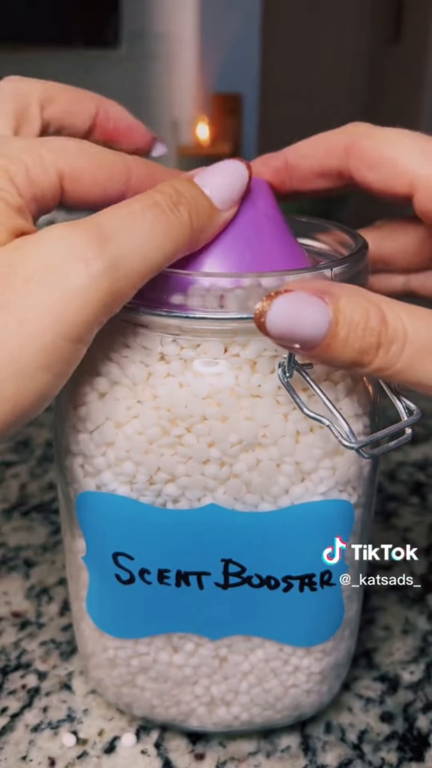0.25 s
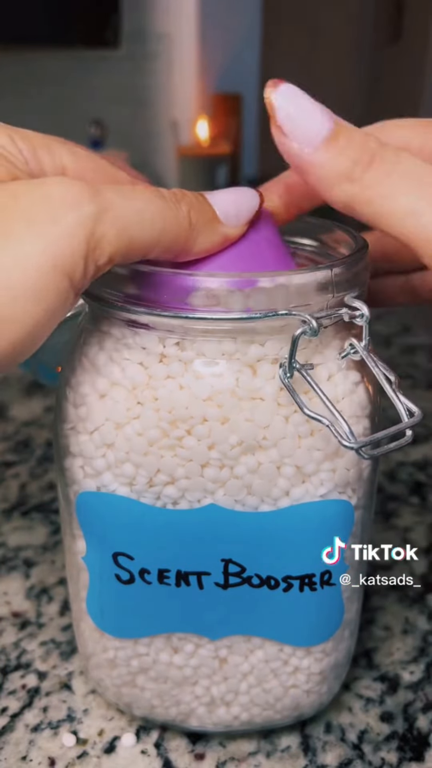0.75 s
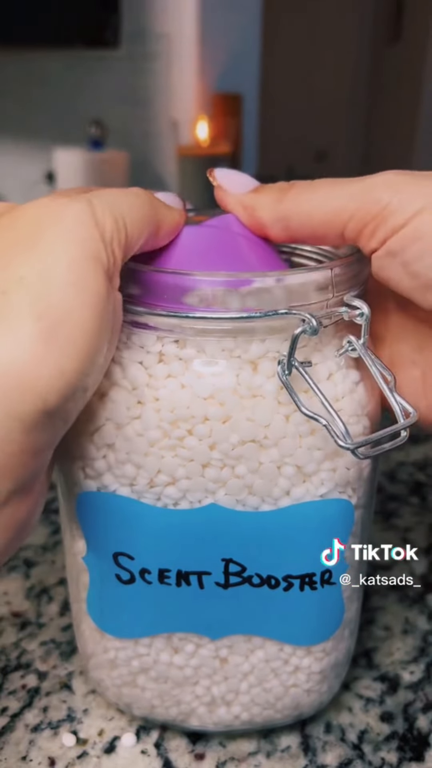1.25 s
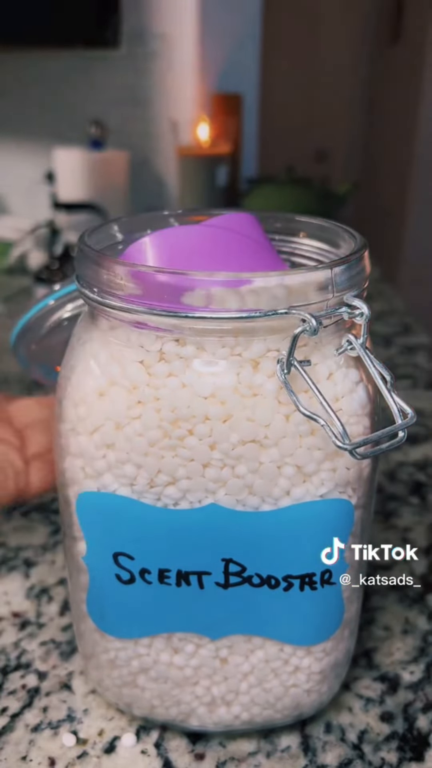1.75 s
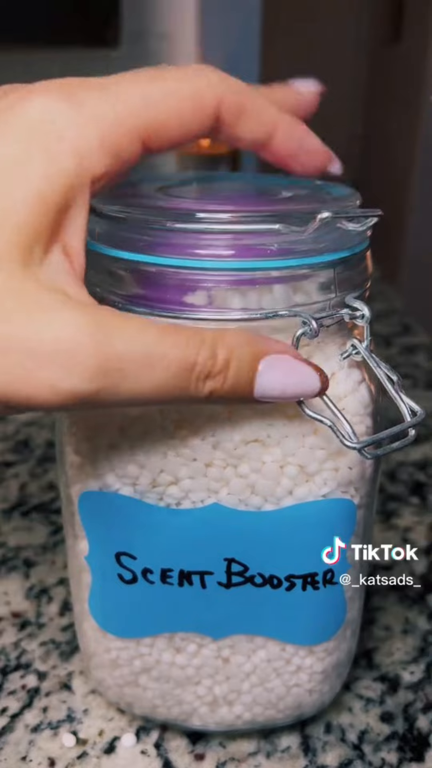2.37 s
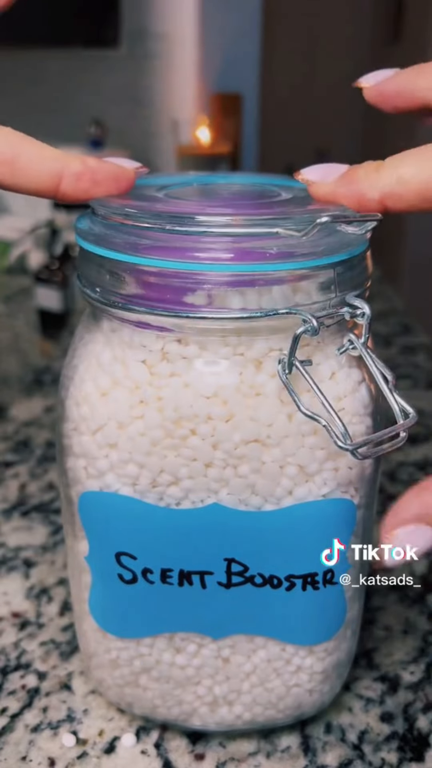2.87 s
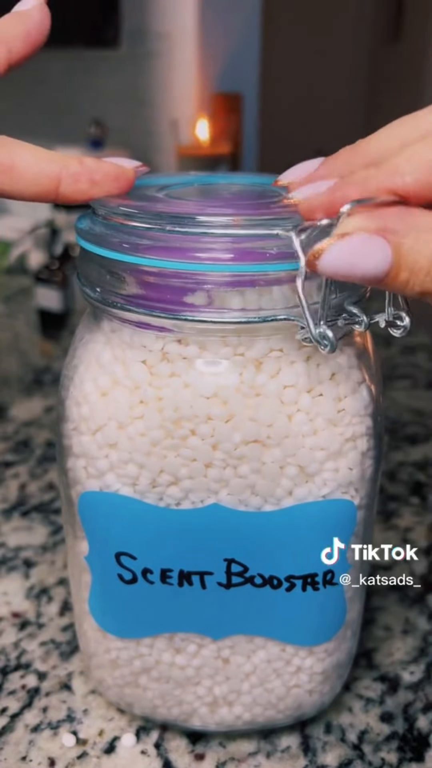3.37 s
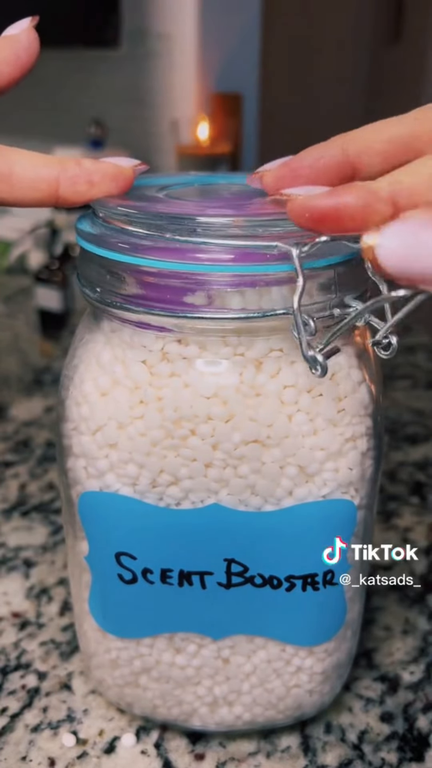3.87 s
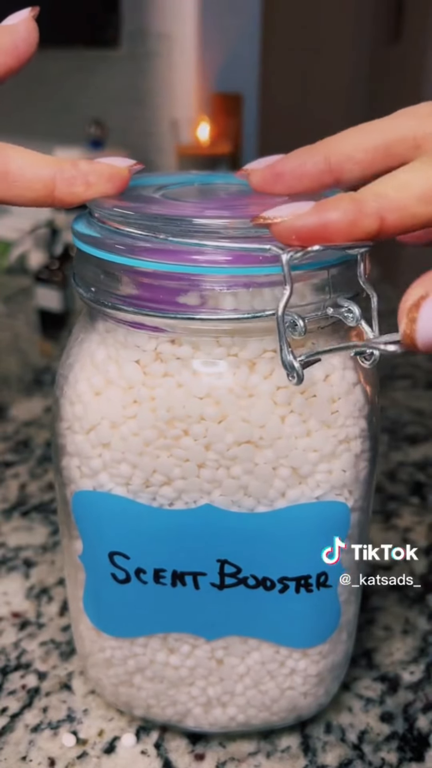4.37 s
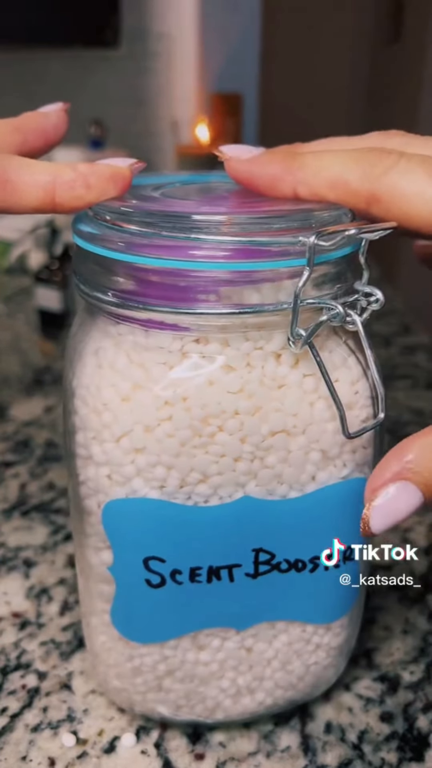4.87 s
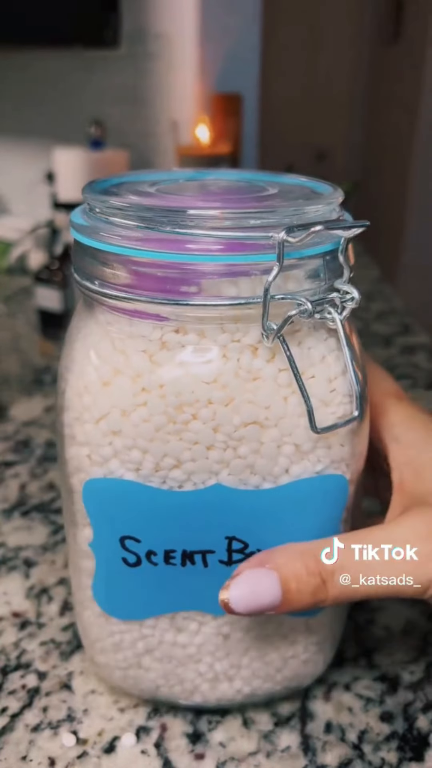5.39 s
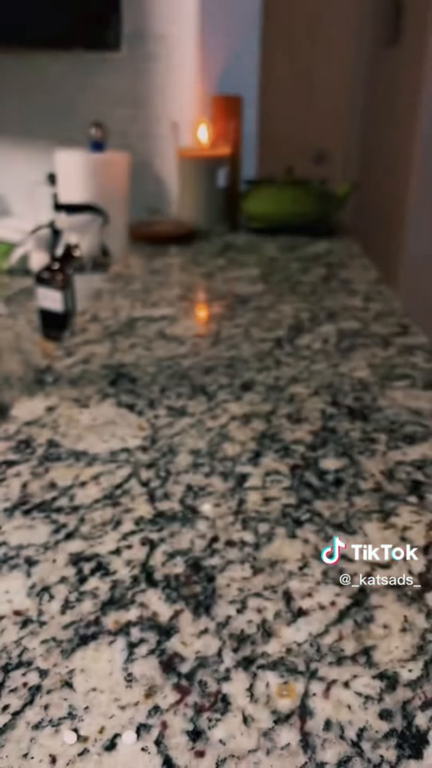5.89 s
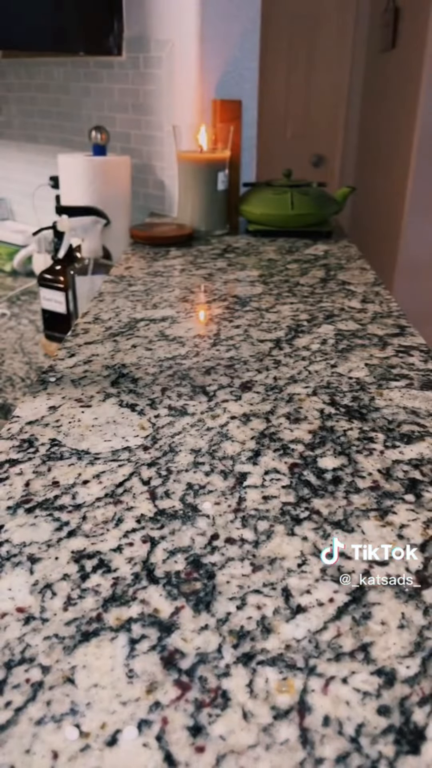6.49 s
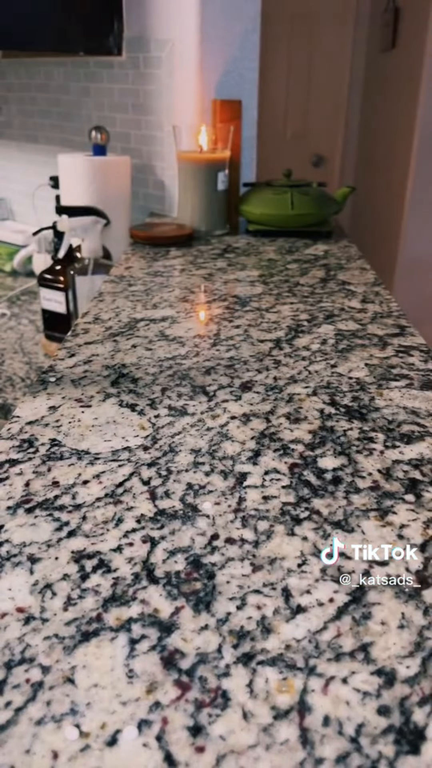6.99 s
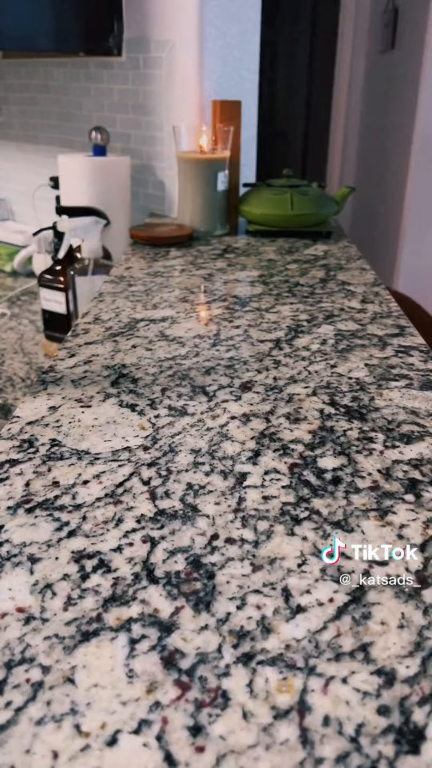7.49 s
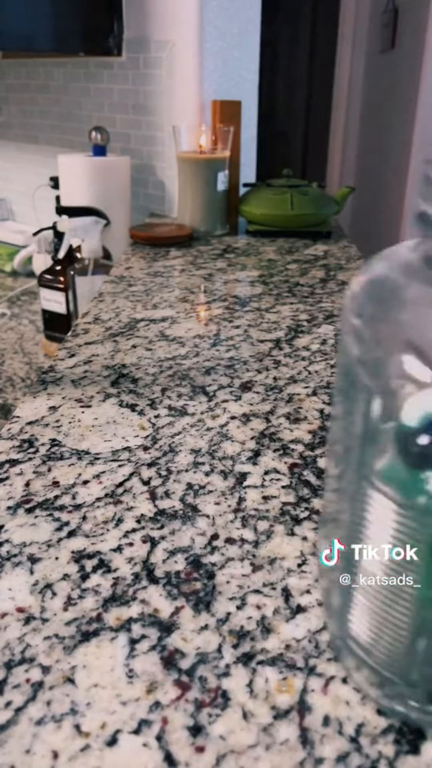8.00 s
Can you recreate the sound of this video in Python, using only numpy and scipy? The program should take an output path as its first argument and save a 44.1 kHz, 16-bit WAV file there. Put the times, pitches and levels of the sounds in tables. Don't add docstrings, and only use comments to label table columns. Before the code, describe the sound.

In a quiet kitchen with faint hum and hiss, a plastic cup is pressed into a bead-filled glass jar with small ticks. The glass lid rattles and claps onto the rim, wire clicks lightly, then the clasp snaps over very sharply and the glass rings briefly. The jar scrapes across stone. After a lull, a hollow ribbed tub bumps down, tilts, lands and drags. Close stereo microphone, short indoor reverberation.

```python
import sys
import numpy as np
from scipy import signal
from scipy.fft import rfft, irfft, next_fast_len
from scipy.io import wavfile
from scipy.ndimage import uniform_filter1d, map_coordinates

SR = 44100
rng = np.random.default_rng(int(sys.argv[2]) if len(sys.argv) > 2 else 0)


def to_linear_factor(level_db):
    exponent = np.asarray(level_db, float) / 20
    return 10 ** exponent


def file_out(sig):
    cols = np.atleast_2d(sig).T
    lim = np.clip(cols, -1, 1)
    pcm = np.round(lim * 32767).astype(np.int16)
    wavfile.write(sys.argv[1], SR, pcm)


N = 363825

# f/Hz, level/dB, t60/s
FAR_MODES = [(268, -1, 0.05), (393, 10, 0.092), (463.5, 5, 0.18), (720, 4, 0.0072), (1460, -14, 0.0054),
             (3180, 0, 0.0082)]
# f/Hz, level/dB, t60/s
TUB_MODES = [(112.2, -23, 0.14), (153, -15, 0.082), (204, -18.5, 0.18), (287.8, -4.5, 0.2),
             (392, -12.5, 0.029), (511, -1, 0.039), (656, 6, 0.013), (753, -0.5, 0.0645), (850, 5, 0.013),
             (1198, 0.5, 0.021)]


def unit(x):
    return x / np.sqrt(np.mean(x ** 2) + 1e-20)


def along(points, hz):
    f, v = np.transpose(points)
    return np.interp(np.log(hz + 1), np.log(f + 1), v)


def wobble(rate):
    knots = rng.standard_normal(int(N * rate / SR) + 4)
    return map_coordinates(knots, [np.arange(N) * rate / SR])


def filtered(x, response):
    m = next_fast_len(N + SR // 2)
    return irfft(rfft(x, m) * response(np.fft.rfftfreq(m, 1 / SR)), m)[..., :N]


def layer_gains(control, layers):
    s, drive_db = np.transpose(control)
    drive_db = np.interp(np.arange(N) / SR, s, drive_db, left=-400, right=-400)
    return [to_linear_factor(level_db + grows * drive_db) for level_db, grows in layers]


def rush(spectrum, patchy_db):
    # f/Hz, correlation
    likeness = [(60, 0.87), (130, 0.67), (290, 0.63), (640, 0.065), (1410, 0.42), (3100, 0.17),
                (15000, 0.26)]
    # f/Hz, level/dB
    room_lean = [(60, -7), (110, 1.5), (200, -5.5), (380, -8.5), (700, 0), (1290, 0), (8120, -0.5),
                 (15000, 0.5)]
    z = signal.stft(rng.standard_normal((2, N)), nperseg=512)[2]
    field = uniform_filter1d(rng.standard_normal(z.shape[1:]), size=5, axis=0)
    field = uniform_filter1d(field, size=8, axis=1)
    pair = signal.istft(z * to_linear_factor(patchy_db * unit(field)), nperseg=512)[1][:, :N]

    def mid_side(hz):
        angle = np.arccos(np.clip(along(likeness, hz), -1, 1)) / 2
        return to_linear_factor(along(spectrum, hz)) * [np.cos(angle), np.sin(angle)]

    mid, side = filtered(pair, mid_side)
    both = np.array([mid + side, mid - side])
    both = filtered(both, lambda hz: to_linear_factor(np.outer([.5, -.5], along(room_lean, hz))))
    return both / np.std(both.mean(0))


def room_tone():
    # t/s, movement re calm/dB
    movement = [(0, 2), (.3, 1), (.7, -1.5), (1.1, -0.44), (2.1, 1.5), (2.7, -0.5), (3.9, 0.2), (4.15, 2),
                (4.35, 0), (5.65, -0.5), (6.1, 1.5), (7.1, -1), (7.4, 4), (8.25, 6.5)]
    layers = [
        (-63, 1.77),
        (-72, 1.64),
        (-66, 1.53),
        (-80.5, 2),
    ]
    # f/Hz, level/dB per Hz
    hum_spectrum = [(12, -34.5), (20, -5.5), (151, 2.5), (304, -1.5), (338, 2), (544, -9), (700, -29.5),
                    (1540, -120)]
    rustle_spectrum = [(290, -24.5), (500, -4), (1210, -7), (1900, -15.5), (2700, -6.5), (3380, -37),
                       (5720, -120)]
    hiss_spectrum = [(1350, -23.5), (2300, -21.5), (2930, -9.5), (4830, -0.5), (5200, -5), (6500, -10),
                     (7500, -38.5), (16500, -120)]
    air_spectrum = [(4000, -32.5), (6800, 1), (7940, 0.5), (9410, -9.5), (11300, -10), (13000, -4.5),
                    (14000, -16), (15500, -12.5)]
    hum, rustle, hiss, air = layer_gains(movement, layers)
    tone = hum * to_linear_factor(2.95 * wobble(28)) * rush(hum_spectrum, patchy_db=0)
    tone += rustle * to_linear_factor(1.2 * wobble(10)) * rush(rustle_spectrum, patchy_db=1.2)
    tone += hiss * rush(hiss_spectrum, patchy_db=1.6)
    return tone + air * rush(air_spectrum, patchy_db=1.2)


def bodies(modes, f, edges_hz, scatter_db=0):
    hz, db, t60 = np.transpose(modes)[:, :, None]
    width = np.log(1000) / np.pi / t60
    sign = (-1) ** np.arange(len(modes))[:, None]
    resonance = 1j * f / (hz * hz - f * f + 1j * f * width)
    radiation = 1j * f / (1j * f + hz / 2) / (1 + 1j * f / (2 * hz)) ** 2
    each = sign * to_linear_factor(db + scatter_db) * resonance * radiation
    group = np.digitize(hz[:, 0], edges_hz)
    return np.array([each[group == g].sum(0) for g in (2, 1, 0)])


def bare(f, low_hz, top_hz):
    return (1j * f / (low_hz + 1j * f)) ** 2 / (1 + 1j * f / top_hz) ** 2


def contacts(events, touch, modes, crack_db, top_hz, scatter_db, blow, body_db,
             edges_hz=(600, 2050), size=10240):
    lead_in = 2048
    out, f = np.zeros(N + size), np.fft.rfftfreq(size, 1 / SR)
    t = (np.arange(size) - lead_in) / SR
    for s, db, knock_db, thump_db, *own in events:
        rise = touch[0]
        length = own[-1] if own else touch[1]
        onset = np.exp(np.minimum(t, 0) / rise)
        swell = np.minimum(onset, to_linear_factor(-60 * np.maximum(t, 0) / length))
        sharp = np.exp(-np.abs(t) / 0.0003)
        push = rng.standard_normal((3, size)) * (swell + blow * sharp)
        scatter = scatter_db * rng.standard_normal((len(modes), 1))
        rings = irfft(rfft(push) * bodies(modes, f, edges_hz, scatter), size)
        crack = irfft(rfft(push[0]) * bare(f, 1200, top_hz), size)
        rings[0] = unit(rings[0]) + to_linear_factor(crack_db) * unit(crack)
        rings /= np.abs(rings).max(1, keepdims=True)
        peaks_db = [db, db + knock_db + body_db, db + thump_db + body_db]
        out[round(s * SR):][:size] += to_linear_factor(peaks_db) @ rings
    return out[lead_in:][:N]


def scrape(speed, layers, modes, rate, spread_db, smooth, bare_db, top_hz):
    hits = rng.random(N) < rate / SR
    sizes = to_linear_factor(spread_db * np.minimum(rng.exponential(1, N), 2))
    grains = hits * sizes * np.clip(rng.standard_normal(N), -2, 2)
    rub = unit(grains) + smooth * rng.standard_normal(N)
    rub = rub * to_linear_factor(1.1 * wobble(45))
    grit, body, rumble = filtered(rub, lambda f: bodies(modes, f, (450, 1800)))
    grit = unit(grit) + to_linear_factor(bare_db) * unit(filtered(rub, lambda f: bare(f, 2000, top_hz)))
    rumble_gain, body_gain, grit_gain = layer_gains(speed, layers)
    return rumble_gain * unit(rumble) + body_gain * unit(body) + grit_gain * unit(grit)


def cup():
    # t/s, tick peak level/dB, knock re tick/dB, thump re tick/dB, own t60/s
    presses = [
        (0.0453, -43, -22, -46, 0.07),
        (0.0847, -65, -17, -27, 0.016),
        (0.1191, -51, -36, -33, 0.13),
        (0.9363, -51.5, -29, -10, 0.096),
        (0.9537, -43, -5.5, 2.5, 0.086),
        (1.0045, -42.5, -30, -4.5, 0.08),
    ]
    # t/s, tick peak level/dB, knock re tick/dB, thump re tick/dB
    brushes = [
        (0.1898, -53.5, -34, -23),
        (0.5467, -69, -28, 3),
        (1.134, -62, -35, -28),
        (1.275, -60, -39, -21),
        (1.445, -48.5, -21, -1.5),
    ]
    # f/Hz, level/dB, t60/s
    cup_modes = [(162, -9, 0.035), (266, -7.5, 0.065), (412, 8, 0.041), (527, -6.5, 0.0091),
                 (910, -8, 0.052), (1230, -1, 0.019), (1750, 0, 0.0086), (3800, 9, 0.014),
                 (5900, -1, 0.019), (12200, 10, 0.0038)]
    out = contacts(presses, (0.0044, .09), cup_modes,
                   crack_db=8, top_hz=8950, scatter_db=7.5, blow=0.24, body_db=8)
    return out + contacts(brushes, (0.0081, 0.2), cup_modes,
                          crack_db=26, top_hz=6900, scatter_db=18, blow=.1, body_db=5)


def glints():
    # t/s, top ring peak level/dB, middle re top/dB, low re top/dB, own t60/s of slow glints
    glint_events = [(.045, -53, -3, -6), (0.7, -54, 0, -10), (1, -47, 6.5, -13), (1.2, -52, -5, 10, 0.07),
                    (2.5, -59, -7, -7), (2, -43.5, -14, 1), (3, -57, -6, -7, .1), (3.5, -55, 7, -15, -0.15),
                    (3, -38.5, -1, -7), (3.5, -51.5, -14, 4, 0.13), (4, -55, -10, -5), (3.5, -48, 5, -13),
                    (4, -47, -9, -18), (4, -62, 13, -5)]
    # f/Hz, level/dB, t60/s
    glint_modes = [(6190, 0, .015), (9600, -3, 0.0044), (10650, 0, 0.0088), (11300, 0, 0.01168),
                   (12720, 0.5, .006)]
    return contacts(glint_events, (0.0027, 0.031), glint_modes, crack_db=-29.5, top_hz=8890,
                    scatter_db=3, blow=.6, body_db=-5, edges_hz=(8000, 11100))


def nails():
    # t/s, tick peak level/dB, knock re tick/dB
    ticks = [(.0857, -40, -22), (.188, -64, -24), (.7163, -63, -20), (.8859, -53, -24), (1.28, -54, -26),
             (1.6282, -59, -22), (1.7779, -55.5, -20.5), (1.9909, -53, -19), (2.354, -43, -20),
             (5.03, -55, -9), (7.299, -46, -23)]
    thump_db = -24
    return contacts([(*row, thump_db) for row in ticks], (0.0027, 0.031), FAR_MODES,
                    crack_db=2, top_hz=4900, scatter_db=-3, blow=1.4, body_db=-4.5)


def counter():
    # t/s, peak level/dB
    thuds = [
        (.985, -43.5),
        (3.411, -39),
        (3.471, -47),
        (4.383, -39),
        (4.639, -40.5),
        (4.964, -45),
        (5.938, -39),
    ]
    # t/s, peak level/dB
    pats = [
        (1.251, -52.5),
        (2.102, -49),
        (4.201, -43.5),
        (4.799, -44.5),
        (5.301, -49.5),
    ]
    # f/Hz, level/dB, t60/s
    counter_modes = [(98, 0.0012, 0.032), (144.7, 0.00053, 0.087), (700, 0, 0.022), (3000, 0, .004)]
    out = contacts([(s, db - 32, 8, 32) for s, db in thuds], (0.0028, 0.026), counter_modes,
                   crack_db=-5.5, top_hz=5000, scatter_db=4.5, blow=0, body_db=-1.5)
    return out + contacts([(s, db - 33, 8, 32) for s, db in pats], (0.019, 0.18), counter_modes,
                          crack_db=-5.5, top_hz=4030, scatter_db=1, blow=0, body_db=-2)


def clasp():
    # t/s, tick peak level/dB, knock re tick/dB, thump re tick/dB
    wire_ticks = [(1.8891, -39.5, -24, -34), (2.1078, -37, -21, -36), (2.1525, -45, -17.5, -15),
                  (2.5097, -51.5, -5, -4), (2.9643, -35.5, -20, -24), (3.1247, -32.5, -13, -11),
                  (3.4138, -45, -16, -17), (3.7155, -34, -18, -35), (3.875, -39.5, -26, -23),
                  (3.9005, -37.5, -30, -21), (3.9588, -26, -17, -22.5), (4.2318, -42, -25, -7.5)]
    # t/s, tick peak level/dB, knock re tick/dB, thump re tick/dB, own t60/s
    rubs = [(3.0243, -42.5, -3.5, 1.5, 0.11), (3.0391, -40.5, -15, -24, 0.13),
            (3.3244, -50, -12.5, -12, 0.089), (3.3947, -55, -21, -16, 0.21),
            (3.4348, -47, -23, -14.5, 0.091), (3.8639, -47.5, -11, -18, 0.12),
            (4.06, -71.5, 12.5, 11.5, 0.091), (4.2492, -64.5, 5.5, 13, 0.1), (4.369, -75.5, 9, 15.5, 0.16),
            (5.11, -68, 3, 8, 0.22), (5.1779, -65, -1, 2.5, 0.77), (5.4079, -54, -21.5, -19, 0.31),
            (7.1545, -46, -23.5, -38, 0.13), (7.195, -43, -48, -44, 0.32), (7.2498, -48.5, -43, -42, 0.98),
            (7.2981, -44.5, -42, -44, 0.2)]
    # f/Hz, level/dB, t60/s
    wire_modes = [(145.4, -13.5, 0.11), (232, -8.5, 0.042), (315, 0, 0.072), (502, 0.5, 0.027),
                  (870, 16, 0.0073), (1800, -4, 0.0052), (2800, 12.5, 0.0022), (3635, -6, 0.015),
                  (5860, 1, 0.017), (10100, -9.5, 0.0088), (11700, -3.5, 0.011)]
    out = contacts(wire_ticks, (0.0027, 0.031), wire_modes,
                   crack_db=2, top_hz=8980, scatter_db=4.5, blow=1.4, body_db=4)
    return out + contacts(rubs, (0.0053, .12), wire_modes,
                          crack_db=7, top_hz=12900, scatter_db=11.5, blow=0.22, body_db=11)


def lid():
    # t/s, tick peak level/dB, knock re tick/dB, thump re tick/dB
    skids = [
        (2.187, -55, 13.5, 4),
        (2.203, -40.5, 13.5, -1.5),
    ]
    rattles = [
        (2.197, -38, 13, -3),
        (2.219, -40, 6.5, 8.5),
        (2.232, -38.5, 15.5, 11.5),
        (2.254, -43, -3, 13),
        (2.285, -37.5, -3, -4.5),
    ]
    claps = [
        (2.2078, -33, 15.5, 11),
        (2.2432, -24, -9.5, -2.5),
        (2.3, -29.5, -2.5, -5),
        (2.392, -49, -29, -9),
    ]
    settlings = [
        (2.325, -47.5, -24, 10.5),
        (2.34, -36, -16, 2.5),
    ]
    # f/Hz, level/dB, t60/s
    lid_modes = [(195, -10.5, 0.06), (353, -1.5, 0.025), (533, -6, 0.025), (854, -10, 0.029),
                 (1190, 2.5, 0.014), (1390, 3.5, 0.011), (1677, -5, 0.0096), (2830, -4.5, 0.012),
                 (4780, -15, 0.014), (6030, -6, 0.022), (11300, -12.5, 0.005)]
    seal_modes = [(174, 5.5, 0.092), (262, -15.5, 0.043), (760, 9, 0.025), (1230, -18, .02),
                  (3040, -17, 0.0025), (12600, -3, 0.0029)]
    out = contacts(skids, (0.0017, .06), lid_modes,
                   crack_db=-11.5, top_hz=3000, scatter_db=4.5, blow=0, body_db=-1)
    out += contacts(rattles, (0.0033, 0.071), lid_modes,
                    crack_db=-10, top_hz=8970, scatter_db=9.5, blow=.1, body_db=3.5)
    out += contacts(claps, (.0018, .016), lid_modes,
                    crack_db=-2.5, top_hz=14100, scatter_db=3, blow=1.3, body_db=8)
    return out + contacts(settlings, (0.0028, 0.026), seal_modes,
                          crack_db=4.5, top_hz=8960, scatter_db=-1.5, blow=.1, body_db=5)


def loose_glass():
    # t/s, tick peak level/dB, knock re tick/dB
    chatter = [
        (2.19, -58, 22),
        (2.2, -47.5, 22.5),
        (2.229, -48, 21.5),
        (2.2427, -37.5, 14.5),
        (2.2991, -39, 18.5),
    ]
    # f/Hz, level/dB, t60/s
    rim_modes = [(300, 0, .03), (1167, -2.5, .02), (1422, 6, .012), (2983, 0, .02), (6030, -3, .015)]
    # t/s, high peak level/dB, middle re high/dB, low re high/dB
    chimes = [
        (4.6195, -37, 6, -16),
        (4.637, -40.5, 4.5, -40.5),
    ]
    # f/Hz, level/dB, t60/s
    chime_modes = [(1961, 0, 1.07), (2767, 6.5, 0.0995), (2869, -1, .28), (4940, -1, .2), (5750, 3, .15),
                   (6100, -1.5, .2), (7800, -3.5, .08), (14000, 5, .6)]
    out = contacts([(*row, -5) for row in chatter], (.0018, .018), rim_modes,
                   crack_db=-4.5, top_hz=9000, scatter_db=3.5, blow=.8, body_db=-2)
    return out + contacts(chimes, (0.0027, 0.031), chime_modes, crack_db=-30, top_hz=9000, scatter_db=-1.5,
                          blow=3, body_db=0.5, edges_hz=(2300, 4400), size=40960)


def stirs():
    # t/s, tick peak level/dB, knock re tick/dB, thump re tick/dB
    stirrings = [
        (2.62, -73.5, 0, 15.5),
        (4.17, -57.5, -2, 5),
        (5.05, -67, 11, 14.5),
        (5.24, -71.5, 11, 13),
        (6.6, -65, 9.5, 5.5),
        (6.7, -62.5, 1, -8),
        (7.05, -69, 12, -6),
    ]
    return contacts(stirrings, (0.019, 0.18), FAR_MODES,
                    crack_db=1, top_hz=2500, scatter_db=3.5, blow=0, body_db=-1.5)


def clasp_snap():
    # t/s, tick peak level/dB, knock re tick/dB, thump re tick/dB
    strikes = [
        (4.6191, -9, -16.5, -24),
        (4.6281, -17, -17.5, -14),
        (4.6361, -14, -42, -29.5),
    ]
    # f/Hz, level/dB, t60/s
    snap_modes = [(60.3, -12.5, 0.059), (181.4, -7, 0.041), (360, -2, 0.068), (497, -8.5, 0.0367),
                  (790, 8.5, 0.023), (1640, 1, 0.0065), (1980, -40, .3), (2800, -3, .055),
                  (4960, -7.5, 0.044), (6410, 24.5, 0.01), (12070, -17.5, 0.022), (13950, -16.5, 0.24),
                  (15530, -14.5, 0.06)]
    return contacts(strikes, (0.0046, 0.016), snap_modes, crack_db=4, top_hz=16000,
                    scatter_db=-5.5, blow=3.1, body_db=5.5, size=30720)


def jar_slide():
    # t/s, tick peak level/dB, knock re tick/dB, thump re tick/dB
    far_knocks = [
        (4.79, -67.5, 10.5, 3.5),
        (6.0982, -49, -14, -18),
        (6.2244, -66.5, -3, 4),
        (6.2764, -52.5, -10.5, -5),
        (6.3443, -65, 4.5, -2),
        (6.4247, -68, 2, 11.5),
        (6.4694, -65.5, -0.5, 6),
    ]
    # t/s, speed re middle/dB
    slide = [
        (5.733, -9.5),
        (5.755, 0.5),
        (5.79, 0),
        (5.82, 1.5),
        (5.85, 0.5),
        (5.875, 4.5),
        (5.92, 4.5),
        (5.945, -4),
        (5.99, -10.5),
    ]
    layers = [
        (-47.5, 1.3),
        (-43, 2),
        (-56, 1.6),
    ]
    # t/s, tick peak level/dB, knock re tick/dB, thump re tick/dB
    catches = [
        (5.757, -63, 13, 25),
        (5.773, -63.5, 5, 24.5),
        (5.813, -52, 0, 8),
        (5.845, -58, 18, 14),
        (5.873, -50, 17, 20),
        (5.882, -54, 20.5, 19),
        (5.899, -59, 26, 7),
        (5.94, -59.5, 25.5, 29),
        (5.953, -48, 7, 2),
    ]
    # f/Hz, level/dB, t60/s
    jar_modes = [(139, -8, 0.1), (222, -2.5, 0.054), (320, -6, 0.073), (538, -1.5, 0.037),
                 (857, -1.5, 0.034), (1265, -4.5, 0.036), (1610, -14, 0.021), (1930, 2, 0.0061),
                 (3110, -10, 0.019), (6400, 13, 0.0022), (11600, -1.5, 0.004)]
    out = contacts(far_knocks, (0.019, 0.18), FAR_MODES,
                   crack_db=2.5, top_hz=2820, scatter_db=9.5, blow=.1, body_db=11)
    out += scrape(slide, layers, jar_modes, 4000, spread_db=3, smooth=1.1, bare_db=-9.5, top_hz=11900)
    return out + contacts(catches, (0.0037, 0.04), jar_modes,
                          crack_db=6, top_hz=3500, scatter_db=3.5, blow=0.28, body_db=0)


def loose_ribs():
    # t/s, high peak level/dB, middle re high/dB, low re high/dB
    buzzes = [
        (7.3, -57, 15.5, 10),
        (7.372, -49, 12, 4),
        (7.862, -45, 13, -6),
        (7.882, -42, 10, -4),
        (7.972, -45, 8, -6),
        (8.085, -46, 2, 0),
    ]
    # f/Hz, level/dB, t60/s
    buzz_modes = [(2240, -2, .03), (2950, -6, .04), (3900, -4, 0.036), (4130, 4, .1), (4370, 3, 0.045),
                  (5870, 11, .02), (7800, 6, 0.011), (12760, -6, 0.24)]
    return contacts(buzzes, (0.004, .07), buzz_modes, crack_db=-2, top_hz=8000,
                    scatter_db=6.5, blow=0.27, body_db=-1.5, edges_hz=(3300, 5200))


def tub_bumps(events, ribs):
    return contacts(events, (0.004, .07), TUB_MODES + ribs, crack_db=-9, top_hz=2240, scatter_db=1.5,
                    blow=1.24, body_db=1, edges_hz=(600, 1600), size=20480)


def tub():
    # t/s, tick peak level/dB, knock re tick/dB, thump re tick/dB, own t60/s
    set_down = [
        (7.3572, -25.5, -6, 8.5, 0.019),
        (7.3652, -16.5, -6, 2.5, 0.074),
        (7.3774, -32, -8, 5, 0.1),
        (7.5762, -39, -11, -5, 0.088),
    ]
    tilts = [
        (7.7478, -35.5, -37, -3, 0.067),
        (7.8236, -38.5, -11, -14, 0.074),
        (7.856, -25.5, -2, 8, 0.065),
        (7.8714, -19, -0.5, -4, 0.14),
        (7.8835, -24, -2, 3.5, 0.081),
    ]
    landings = [
        (7.9698, -17, 1, 3.5, 0.046),
        (7.9894, -35, -13, 12, 0.16),
        (8.0805, -35.5, -8, -9, 0.16),
        (8.2075, -39.5, -6, 12.5, 0.0057),
    ]
    # t/s, tick peak level/dB, knock re tick/dB, thump re tick/dB
    rocking = [
        (7.45, -67.5, 31.5, 41),
        (7.79, -65, 11, 35),
        (8.23, -63, 2, 27),
    ]
    # f/Hz, level/dB, t60/s
    rib_modes = [(1046, 4.5, 0.027), (1820, 5, 0.021), (2040, -2.5, 0.045), (3147, -7.5, 0.041),
                 (3640, -3, 0.053), (4160, -8, 0.027), (4500, -10, 0.062), (7540, -17.5, 0.031),
                 (15330, -37, 0.22)]
    tilted_ribs = [(1130, 5, 0.011), (1820, 7, 0.022), (1995, 7, 0.028), (2790, -7.5, 0.043),
                   (3648, -3, 0.053), (4170, -1.5, 0.07), (4610, 3, 0.015), (12800, -44, .3),
                   (15330, -45, .27)]
    landed_ribs = [(1210, 0.5, 0.036), (1730, -9, 0.026), (1996, 1.5, 0.061), (2267, 1, 0.044),
                   (3730, -2, 0.022), (4150, -3, 0.027), (4430, 7, 0.0099), (12700, -42, 0.27),
                   (15000, -39, .27)]
    tipped = tub_bumps(tilts, tilted_ribs) + tub_bumps(landings, landed_ribs)
    out = tub_bumps(set_down, rib_modes)
    out += filtered(tipped, lambda hz: 1 / (1 + (hz / 12800) ** 10))
    return out + contacts(rocking, (0.05, 0.16), TUB_MODES + rib_modes, crack_db=1, top_hz=5100,
                          scatter_db=15.5, blow=0, body_db=-4, size=20480)


def tub_drag():
    # t/s, speed re middle/dB
    drag = [
        (7.8, -30),
        (7.85, -33),
        (7.93, -5),
        (8.02, -7),
        (8.1, 5.5),
        (8.18, 8),
        (8.25, 11.5),
    ]
    layers = [
        (-49, 0.38),
        (-51, 0.16),
        (-60, 1.52),
    ]
    # t/s, tick peak level/dB, knock re tick/dB, thump re tick/dB
    skips = [
        (7.779, -56, 2, 10),
        (7.843, -54, 0, 11.5),
        (8.027, -44.5, 12, 15),
        (8.101, -45.5, 8, -1),
        (8.121, -51, 13, 11),
        (8.15, -41.5, 8, 7),
        (8.2095, -38.5, 13, 0),
    ]
    # f/Hz, level/dB, t60/s
    drag_modes = [(159, -8.5, 0.084), (287, -6, .08), (533, 13, 0.02), (702, 18.5, 0.059),
                  (1294, -8.5, 0.12), (1960, 3, 0.053), (2600, -14, 0.026), (3030, -8.5, 0.054),
                  (3800, -5, .025), (4220, 5, 0.022), (5920, -10, 0.028), (7460, -11, 0.035),
                  (11200, -14, 0.023), (12600, -17, .12)]
    out = scrape(drag, layers, drag_modes, 1500, spread_db=3.5, smooth=0.8, bare_db=-5, top_hz=6230)
    return out + contacts(skips, (0.0037, 0.04), drag_modes,
                          crack_db=-20, top_hz=4000, scatter_db=-4, blow=0.55, body_db=-2)


def ports(x, lean):
    # f/Hz, level/dB
    echo_levels = [(260, -31), (560, -1.5), (1100, -12.5), (5000, -17)]
    delays_s = (.0043, .0071, .0118)

    def response(hz):
        echoes = sum(np.exp(-2j * np.pi * hz * s) for s in delays_s) / 2
        direct = to_linear_factor(np.outer([.5, -.5], along(lean, hz)))
        return direct + np.outer([1, -1], to_linear_factor(along(echo_levels, hz)) * echoes)

    return filtered(x, response)


def kitchen(x):
    # f/Hz, t60/s
    decay = [(150, 0.51), (1000, 0.42), (4000, 0.54), (12000, 0.28), (14000, 0.13)]
    hz, t, z = signal.stft(rng.standard_normal((2, SR // 2)), SR, nperseg=256)
    tail = signal.istft(z * to_linear_factor(-60 * t / along(decay, hz)[:, None]), SR, nperseg=256)[1]
    tail = tail / np.linalg.norm(tail[0])
    return signal.fftconvolve(np.pad(x, (220, 0))[None], tail, axes=1)[:, :N]


def scene():
    # f/Hz, level/dB
    jar_lean = [(60, -4), (110, -2), (200, -6.5), (380, -13.5), (700, -8), (1290, -1), (2380, 2.5),
                (8120, -2)]
    tub_lean = [(60, 0), (110, -11), (200, -4.5), (380, -11), (700, -13.5), (1290, -5.5), (2380, 1),
                (4400, -0.5)]
    jar = cup() + counter() + lid() + stirs() + jar_slide()
    wire = glints() + nails() + clasp()
    snap = clasp_snap()
    loose = loose_glass() + loose_ribs()
    dragged = tub() + tub_drag()
    direct = ports(jar + wire + snap + loose, jar_lean) + ports(dragged, tub_lean)
    wet = kitchen(to_linear_factor(-10) * jar + to_linear_factor(-9) * wire + to_linear_factor(-3.5) * snap)
    wet += to_linear_factor(-9.5) * kitchen(dragged) + to_linear_factor(-15) * kitchen(loose)
    return direct + wet + room_tone()


def band_limit(x):
    return signal.sosfilt(signal.butter(12, 16790, fs=SR, output="sos"), x)


def record(dry):
    # f/Hz, level/dB
    microphone = [(20, -2), (11000, -2.5), (13000, -3), (15000, -12), (15800, -4.5), (16400, -73)]
    mix = filtered(dry, lambda hz: to_linear_factor(along(microphone, hz)))
    return band_limit(mix)


dry = scene()
out = record(dry)
file_out(out)
```